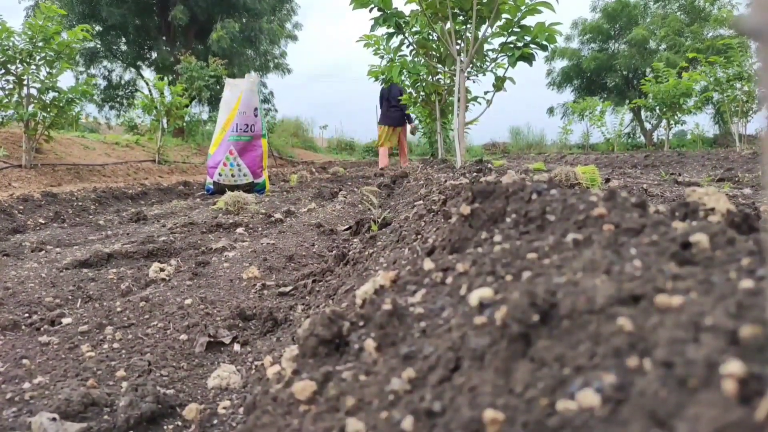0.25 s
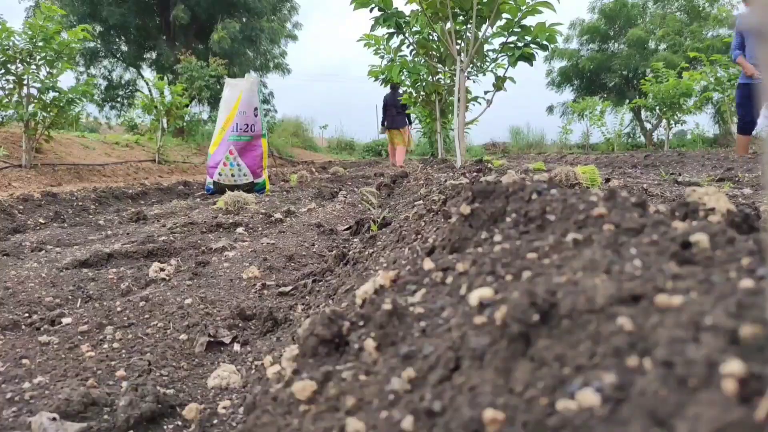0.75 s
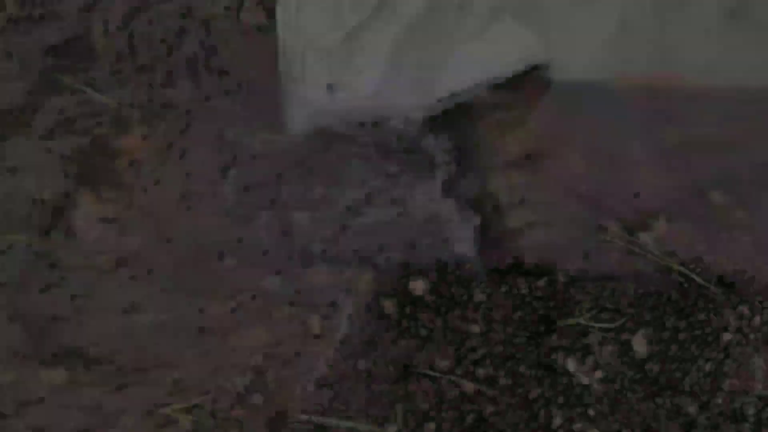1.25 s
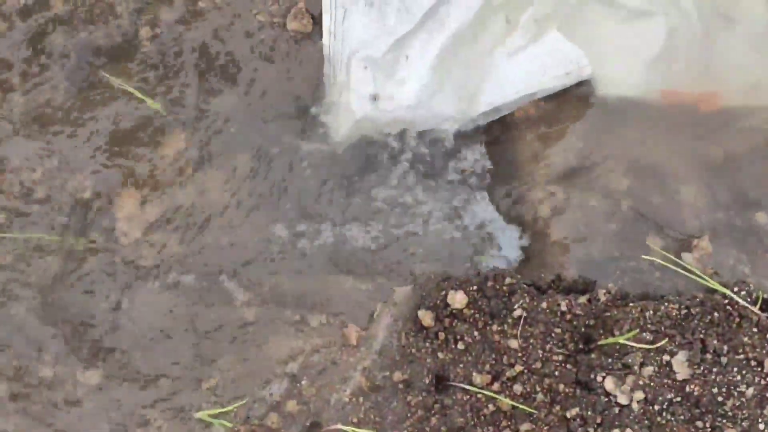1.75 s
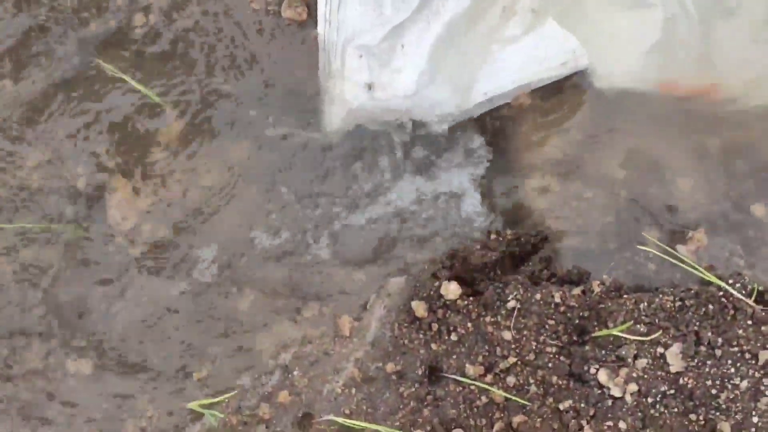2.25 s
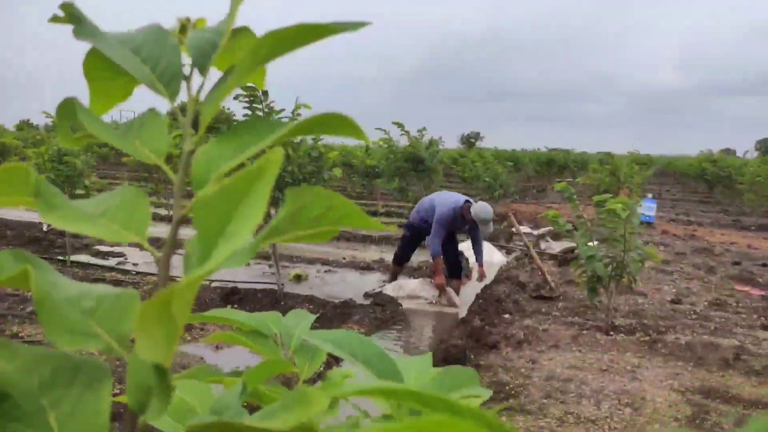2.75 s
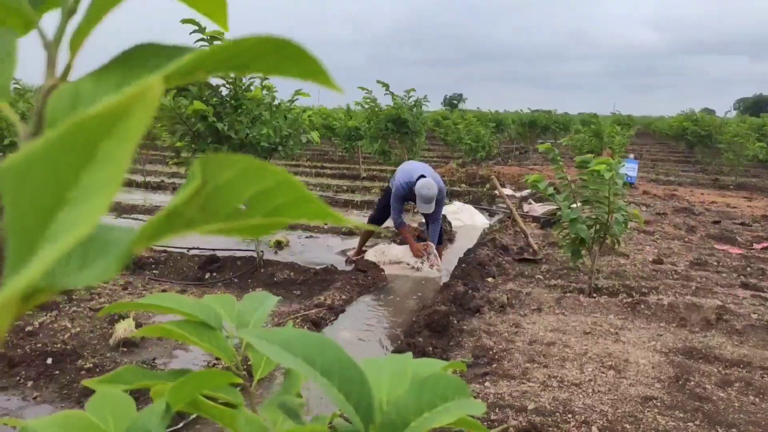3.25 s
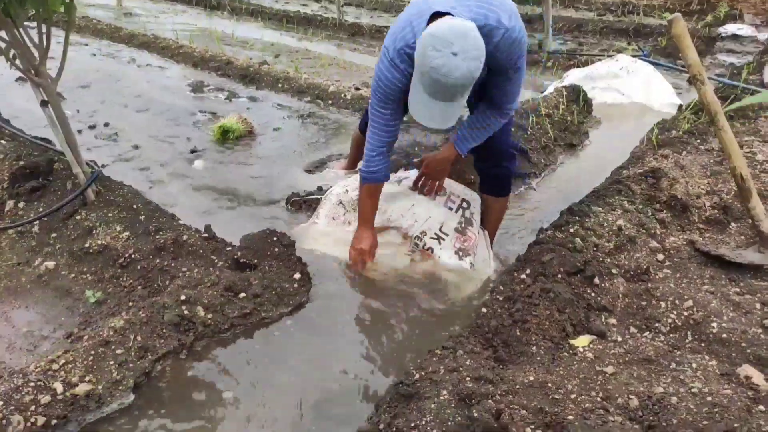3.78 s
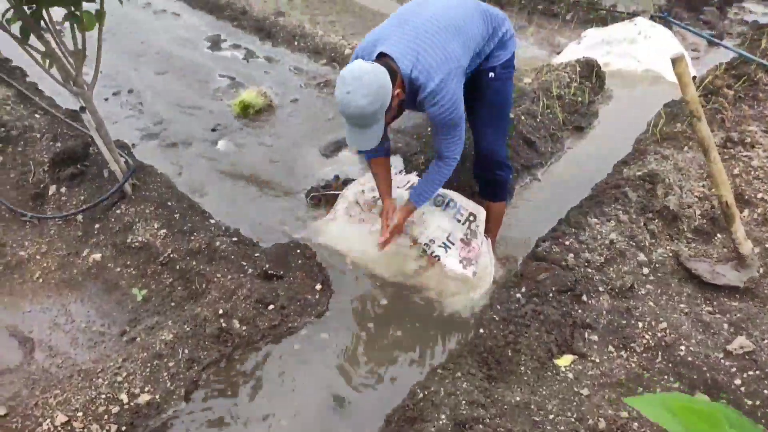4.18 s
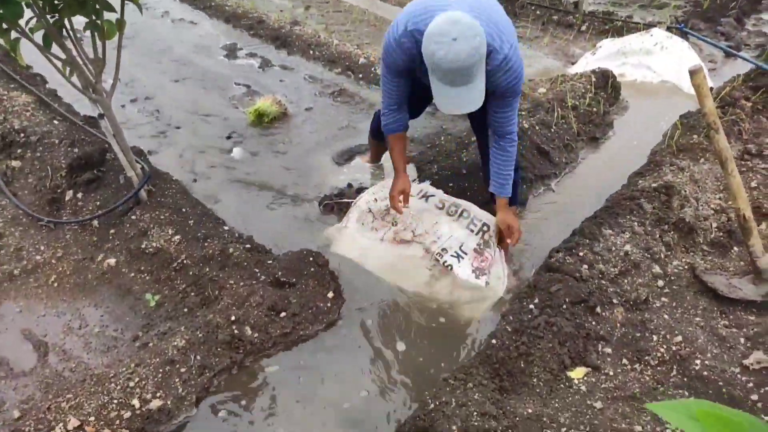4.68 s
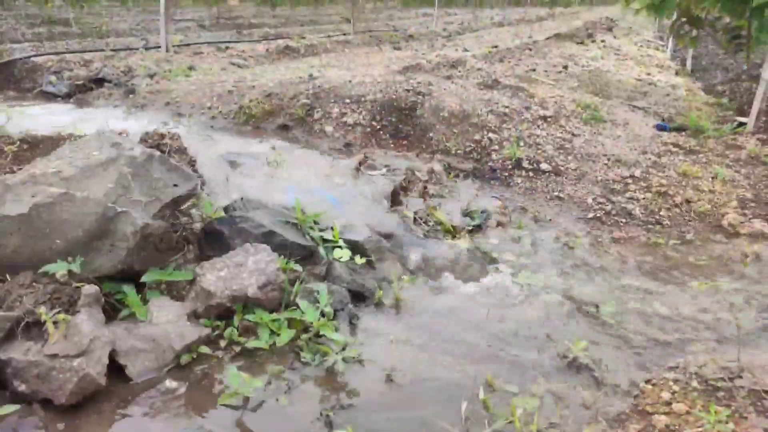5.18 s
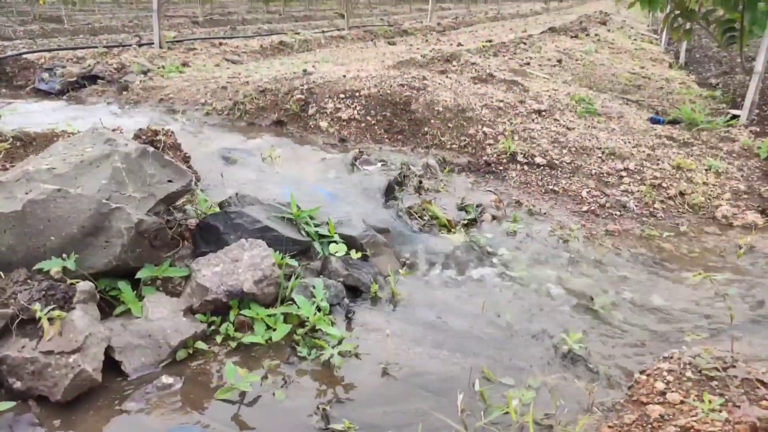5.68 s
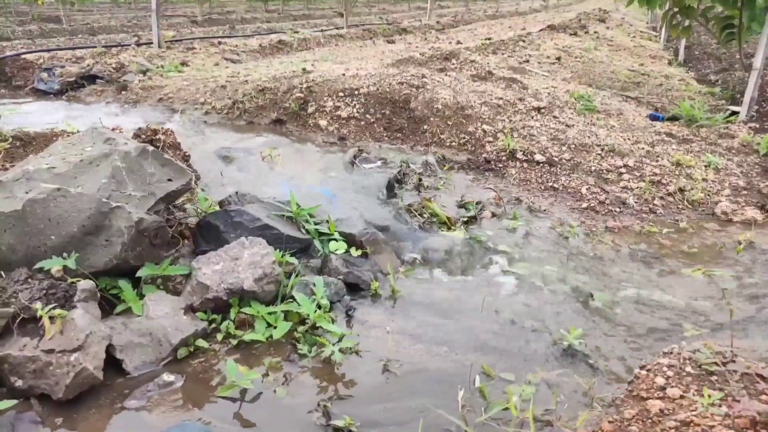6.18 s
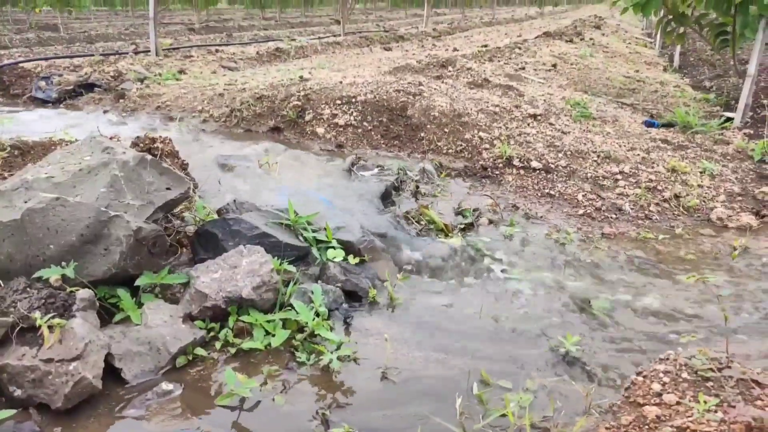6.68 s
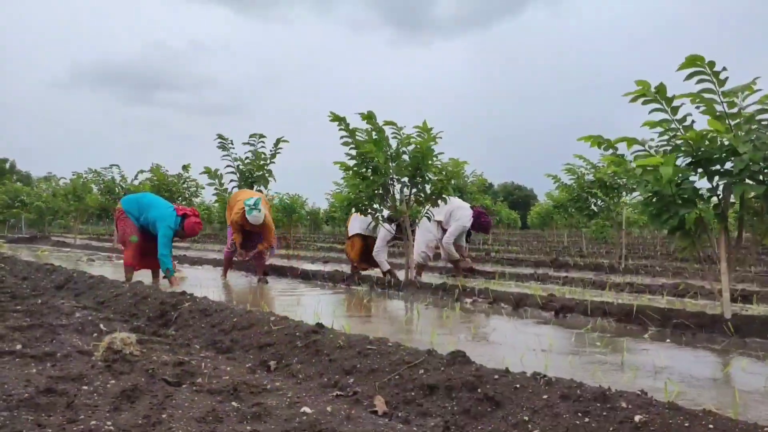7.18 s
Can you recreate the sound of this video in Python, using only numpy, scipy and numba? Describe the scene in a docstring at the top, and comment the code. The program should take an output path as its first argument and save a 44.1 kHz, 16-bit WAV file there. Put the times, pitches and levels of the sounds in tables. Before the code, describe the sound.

Irrigation water spills past a sack, runs down a furrow and rushes over stones while wind gusts buffet the microphone.

```python
"""An open field: a breeze with gusts buffets two microphone ports throughout, over soft far-off knocks at first.
Then irrigation water is heard from four spots in turn: spilling past a sack, while a bird warbles once, running
down a furrow, splashed as the sack is pressed into the channel, and rushing over stones; wind is left at the end.
The water is a swarm of ringing bubbles and droplets over filtered noise, the wind is noise in drifting bands,
each buffet a push and pull of pressure, the knocks brief swells of noise, and the bird gliding sines."""
import sys
import numpy as np
from scipy import signal
from scipy.fft import rfft, irfft, next_fast_len
from scipy.io import wavfile
from scipy.ndimage import uniform_filter1d
from numba import njit

SR = 44100
rng = np.random.default_rng(int(sys.argv[2]) if len(sys.argv) > 2 else 0)


def dump_mix(stems):
    """Bounce the given channels to the path in sys.argv[1] as a 16-bit WAV at rate SR."""
    frames = np.atleast_2d(stems).T  # one column per channel
    limited = np.clip(frames, -1, 1)  # hard clip at full scale
    pcm = np.round(limited * 32767).astype(np.int16)
    wavfile.write(sys.argv[1], SR, pcm)


N = 327663
TIME = np.arange(N) / SR  # s
FADE_S = 0.03  # each spot of water fades in over this time


def from_db(db):
    """Decibels to gain."""
    return 10 ** (np.asarray(db) / 20)


def rms_one(x):
    """Scale to rms 1."""
    return x / np.sqrt(np.mean(x ** 2) + 1e-20)


def at_hz(points, hz):
    """Read a spectrum in dB on a log-frequency axis."""
    f, value = np.transpose(points)
    return np.interp(np.log(hz + 1e-3), np.log(f), value)


def panned(side_db):
    """Left and right gains of unit mean power, from the left-right difference in dB."""
    gains = from_db(np.array([side_db, -side_db]) / 2)
    return gains / np.sqrt(np.mean(gains ** 2, axis=0))


def coloured(x, gain_at):
    """Filter by a smooth gain over frequency."""
    size = next_fast_len(N + 4096)
    hz = np.arange(size // 2 + 1) * SR / size
    return irfft(rfft(x, size) * gain_at(hz), size)[..., :N]


def drift(rate):
    """Slow random wandering of spread 1: noise through a two-pole low-pass at the given rate in Hz."""
    step = 20  # samples between the computed points
    r = np.exp(-2 * np.pi * rate * step / SR)
    noise = rng.standard_normal(N // step + 2002)
    slow = signal.lfilter([1], [1, -2 * r, r * r], noise)[2000:]  # the start-up is dropped
    return np.interp(np.arange(N) / step, np.arange(len(slow)), rms_one(slow))


def swell(s, db, length, onset_power, drop_power):
    """Power that rises to a peak and falls again; a power of 2 is a plain bell, a higher one is squarer."""
    shape = np.zeros(N)
    near = np.abs(TIME - s) < 4 * length
    t = (TIME[near] - s) / length
    shape[near] = np.exp(-np.abs(t) ** np.where(t < 0, onset_power, drop_power))
    return from_db(db) ** 2 * shape


def still_air(level_db):
    """The steady hush of the field: coloured noise, independent left and right."""
    # Colour of the hush. Each row: frequency in Hz, relative level in dB per Hz
    hush = [(290, 1.5), (500, -6), (649, -13), (729, -6), (1300, -9), (3020, -7.5), (5880, -11.5),
            (7860, -9.5), (8830, -12.5), (15100, -11.5), (16000, -22)]
    noise = rng.standard_normal((2, N))
    return from_db(level_db) * rms_one(coloured(noise, lambda f: from_db(at_hz(hush, f))))


def wind_levels():
    """Wind at the left and right port in dB: gusts ride on the breeze and strike the windward port harder."""
    # Gusts on the ports. Each row: peak time in seconds, peak level in dB before the wind's trim,
    # half-length in seconds, left-right difference in dB
    gusts = [(0.124, -34, .19, 15), (0.792, -38, 0.23, 1), (1.374, -23, 0.039, 0), (1.465, -18.5, 0.077, 8),
             (1.823, -22, 0.039, 11), (2.014, -28.5, 0.03, 12), (2.147, -29.5, 0.12, 0),
             (2.506, -26, 0.056, 11), (2.688, -25, 0.092, 5.5), (2.9, -37.5, 0.14, 8),
             (3.973, -24.5, 0.097, -16), (4.132, -14, 0.061, -7.5), (4.288, -15, 0.052, -7.5),
             (4.52, -26, 0.097, -8.5), (4.758, -19, 0.07, -19), (4.951, -14, 0.049, -19),
             (5.07, -15, 0.063, -13), (6.306, -28.5, 0.044, 5.5), (6.49, -27.5, 0.073, 11),
             (6.939, -29, 0.04, -1), (7.19, -19, 0.062, -9.5), (7.388, -23.5, 0.1, -2)]
    breeze_db, breeze_side_db = -40.5, 1.5  # level before trim, left-right difference
    power = (from_db(breeze_db) * panned(breeze_side_db)[:, None]) ** 2
    for s, db, length, side_db in gusts:
        gust = swell(s, db, length, onset_power=1.85, drop_power=2.6)
        power = power + panned(side_db)[:, None] ** 2 * gust
    return 10 * np.log10(power)


def port_wind(level_db, lumpy_db, lumps_per_s, brighten, trim_db):
    """Turbulence at one port: it comes in lumps, and stronger wind sheds smaller, higher eddies."""
    # Turbulence in a moderate gust. Each row: frequency in Hz, relative level in dB per Hz
    turbulence = [(12, -13), (25, 1.5), (50, -2), (90, -2), (150, -2.5), (250, -10.5), (400, -18),
                  (700, -34.5), (1400, -46), (3000, -53.5)]
    out = np.zeros(N)
    lumps = drift(lumps_per_s)
    edges = 14 * 2 ** (np.arange(13) * 2 / 3)  # Hz, bands two thirds of an octave wide
    centres = np.sqrt(edges[1:] * edges[:-1])
    shares = from_db(at_hz(turbulence, centres)) * np.sqrt(centres)  # a higher band is wider
    shares = shares / np.linalg.norm(shares)
    white = rng.standard_normal((2, N))  # neighbouring bands take different noise
    for k, share in enumerate(shares):
        band_pass = signal.butter(2, edges[k:k + 2], "band", fs=SR, output="sos")
        band = rms_one(signal.sosfilt(band_pass, white[k % 2]))
        small = np.clip(np.log2(centres[k] / 70) / 3, 0, 1)  # 0 for big eddies, 1 for small ones
        swing_db = lumpy_db * (0.44 + small)
        # offsets the mean power that the lumps would add
        steady_db = swing_db ** 2 * np.log(10) / 20
        brighter_db = brighten * small * (level_db + 28.0)
        out += share * band * from_db(swing_db * np.minimum(lumps, 2) - steady_db + brighter_db)
    # the breeze and gusts alone set the slow swell
    slow_rms = np.sqrt(uniform_filter1d(out ** 2, size=4000) + 1e-12)
    return out / slow_rms * from_db(level_db + trim_db)


def buffets(level_db):
    """An eddy crossing a port gives one push and pull of pressure."""
    # Single eddies that thump a port. Each row: time in seconds, peak in dB before level_db,
    # left-right difference in dB, length in seconds
    eddies = [(1.468, -7.5, 17, 0.0057), (1.509, -6.5, 22, 0.0025), (1.647, -12.5, 27, 0.0033),
              (2.481, -8.5, 28, 0.0051), (2.715, -10.5, 17, 0.0024), (3.557, -15, -24, 0.0036),
              (4.036, 2.5, -46, 0.0068), (4.535, -4, -30, 0.0048), (4.689, -12.5, -19, 0.002),
              (4.85, -18, -11, 0.0017), (4.931, -6, -30, 0.0014), (4.95, -4.5, -25, 0.0016),
              (5.163, -11, -16, 0.0016), (4.144, -9, -1, 0.0019), (7.145, -11, -18, 0.0019),
              (7.348, -8, 16, 0.0022)]
    out = np.zeros((2, N))
    for s, db, side_db, length in eddies:
        u = (s - TIME) / length
        push_pull = 2 * u / (1 + (2 * u) ** 2) ** 2 * np.pi
        out += from_db(db + level_db) * panned(side_db)[:, None] * push_pull
    return out


def knocks(width):
    """Soft, dull far-off knocks: brief swells of noise round one pitch."""
    # Each row: time of the peak in seconds, level in dB, pitch in Hz
    far_knocks = [(0.422, -42.5, 527), (0.448, -49, 632), (.5, -51, 493), (0.559, -48, 577),
                  (0.816, -45.5, 337)]
    half_length_s = 0.015
    out = np.zeros((2, N))
    for s, db, hz in far_knocks:
        b, a = signal.butter(2, [hz / (1 + width), hz * (1 + width)], "band", fs=SR)
        body = signal.lfilter(b, a, rng.standard_normal(N))
        out += from_db(db) * rms_one(body) * np.exp(-((TIME - s) / half_length_s) ** 2)
    return out


def bird(level_db, side_db, flutter_db, husky):
    """One quick phrase: each note swells, glides from pitch to pitch and fades; fast waver makes it husky."""
    # Each row: start in seconds, length in seconds, level in dB before level_db and flutter,
    # first and last pitch in Hz before the waver
    notes = [(2.099, 0.048, -34, 3950, 3020), (2.168, 0.02, -25, 2890, 3360),
             (2.177, 0.039, -29, 3600, 3520), (2.208, 0.033, -33, 2890, 2890),
             (2.234, .02, -31.5, 3580, 3020), (2.259, 0.014, -26, 2800, 3930),
             (2.271, 0.0125, -23.5, 3380, 2970), (2.282, 0.0099, -30, 3750, 3600)]
    out = np.zeros(N)
    waver = 1 + husky * drift(510)
    for s, length, db, first_hz, last_hz in notes:
        singing = (TIME > s) & (TIME < s + length)
        u = (TIME[singing] - s) / length
        hz = (first_hz + (last_hz - first_hz) * u) * waver[singing]
        phase = 2 * np.pi * np.cumsum(hz) / SR
        out[singing] += from_db(db) * np.sqrt(np.sin(np.pi * u)) * np.sin(phase)
    return panned(side_db)[:, None] * from_db(level_db + flutter_db * drift(250)) * out


@njit
def ring_bubbles(start, height, hz, cycles, rise, length, sr):
    """Sum of dying sines, each climbing in pitch as its bubble nears the surface."""
    out = np.zeros(length)
    for k in range(len(start)):
        life = cycles[k] / hz[k]  # s to fade to 1/e
        first = max(int(start[k] * sr) + 1, 0)
        last = min(int((start[k] + 5 * life) * sr), length)
        for i in range(first, last):
            t = i / sr - start[k]
            envelope = (1 - np.exp(-2 * hz[k] * t)) * np.exp(-t / life)
            out[i] += height[k] * envelope * np.sin(2 * np.pi * hz[k] * t * (1 + rise * t / life))
    return out


def swarm(span, spectrum, low_hz, high_hz, per_s, spread_db, cycles, rise, splashing, lead, scatter, wash_db):
    """Bubbles of random size and place, born in splashes, over a wash of ones too small to tell apart; rms 1."""
    inside = (TIME >= span[0]) & (TIME <= span[1])
    count = int(per_s * (span[1] - span[0]))
    when, pitch, size, damping, place, side = rng.random((count, 6)).T
    births = np.cumsum(inside * splashing)
    start = np.interp(when * births[-1], births, TIME)
    hz = low_hz * (high_hz / low_hz) ** pitch
    lasting = .5 * 4 ** damping  # some ring half as long, some twice
    # high bubbles die sooner and share a wider band, so the same density needs more height
    size_db = spread_db * np.minimum(-np.log(1 - size), 3.2)
    height = hz / np.sqrt(lasting) * from_db(at_hz(spectrum, hz) + size_db)
    # each place in the stream reaches the two ports with its own delay
    delay = lead + scatter * np.log((place + 1e-6) / (1 - place + 1e-6))
    gains = panned(8 * (side - .5))
    rings = np.array([
        ring_bubbles(start + c * delay, height * gains[c], hz, cycles * lasting, rise, N, SR)
        for c in (0, 1)])
    noise = rng.standard_normal((2, N))
    wash = coloured(noise, lambda f: from_db(at_hz(spectrum, f)) * (f > low_hz) * (f < high_hz))
    gate = uniform_filter1d(inside * 1., size=256)
    wash = from_db(wash_db) * rms_one(wash * np.sqrt(splashing)) * gate
    both = rings / rings[:, inside].std() + wash
    return both / both[:, inside].std()


def plops(span, level_db, rise, count=3):
    """The bubbles and drops that stand out of the swarm at one spot, each followed by its quieter fragments."""
    # Large bubbles and drops. Each row: start in seconds, height in dB before level_db, starting pitch in Hz
    large_bubbles = [(1.271, -26, 1750), (1.376, -16.5, 5740), (1.485, -22, 8000), (1.608, -18, 6200),
                     (1.682, -23, 1450), (1.992, -24.5, 2410), (2.018, -19.5, 780), (2.034, -16.5, 980),
                     (2.056, -23.5, 1420), (2.068, -17, 6730), (2.171, -18, 1800), (2.253, -16.5, 1630),
                     (2.276, -11.5, 6100), (2.293, -14, 6160), (2.325, -21, 1820), (2.531, -20.5, 824),
                     (2.609, -20, 1660), (2.905, -19, 7600), (2.978, -26, 930), (3.113, -25, 630),
                     (3.44, -30, 855), (3.686, -27.5, 4200), (4.089, -17, 7700), (4.104, -20, 5840),
                     (4.138, -20, 6400), (4.151, -21, 5620), (4.199, -16.5, 7430), (4.422, -19.5, 2770),
                     (4.003, -26, 1900), (4.319, -24.5, 2380), (4.583, -28, 6360), (4.745, -29, 7850),
                     (4.892, -30, 5700), (4.943, -27, 4660), (5.114, -20.5, 1270), (5.137, -23, 3400),
                     (5.208, -19.5, 3080), (5.27, -18, 1940), (5.507, -21.5, 1167), (5.543, -20.5, 1280),
                     (5.591, -19.5, 820), (5.787, -18.5, 5130), (5.868, -20.5, 1140), (5.952, -16, 4020),
                     (5.976, -16.5, 5000), (5.985, -16, 6460), (6.264, -17, 7840), (6.274, -22, 1400),
                     (6.394, -20, 2700), (6.434, -8, 5500), (6.543, -13, 2620), (6.685, -16, 6080),
                     (6.765, -20.5, 4140), (6.818, -19.5, 1600), (6.949, -32.5, 5100)]
    # fragments: mean delay, loss, and largest shift of pitch either way
    fragment_s, fragment_loss_db, fragment_octaves = .008, 14.5, 0.28
    rings = []
    for s, db, hz in large_bubbles:
        if span[0] < s < span[1] + FADE_S:
            rings.append((s, db, hz))
            for late, off in rng.uniform([0, -1], [2, 1], (count, 2)):
                fragment_hz = hz * 2 ** (fragment_octaves * off)
                rings.append((s + fragment_s * late, db - fragment_loss_db, fragment_hz))
    s, db, hz = np.transpose(rings).copy()
    # 2 cycles to 1/e at 1 kHz; smaller, higher bubbles ring for more cycles
    cycles = 2 * (hz / 1000) ** 0.51
    return ring_bubbles(s, from_db(db + level_db), hz, cycles, rise, N, SR)


def flow(span, gurgle_db, spray_db):
    """Strength of gurgle and spray at one spot: a steady flow plus the sloshes above it."""
    # Each row: peak time in seconds, gurgle peak in dB, spray peak in dB, half-length in seconds
    sloshes = [(1.697, -40, -42, 0.027), (2.04, -38, -61, 0.011), (2.584, -38, -37, 0.065),
               (2.36, -46, -41.5, 0.051), (2.85, -38, -46, 0.016), (3.83, -50, -56, 0.13),
               (4.017, -43, -45, 0.029), (4.14, -46, -42, 0.043), (4.232, -40, -38.5, 0.079),
               (4.407, -45.5, -40.5, 0.075), (4.52, -43, -47.5, 0.02), (4.717, -53, -51, 0.028),
               (5.292, -37.5, -39, 0.019), (5.973, -40, -39, 0.016), (6.268, -44, -33, 0.018)]
    power = from_db([[gurgle_db], [spray_db]]) ** 2
    for s, gurgle_peak, spray_peak, length in sloshes:
        if span[0] < s < span[1]:
            peaks_db = [[gurgle_peak], [spray_peak]]
            power = power + swell(s, peaks_db, length, onset_power=1.4, drop_power=2.9)
    return np.clip((TIME - span[0]) / FADE_S, 0, 1) * np.sqrt(power)


def stream(span, spectrum, sides, bubbles_per_s, drops_per_s, gurgle_db, spray_db, lead, slap_db, fizz_db):
    """Each slap of water traps air that gurgles below 3 kHz and throws droplets that crackle above."""
    gurgle_gain, spray_gain = flow(span, gurgle_db, spray_db)
    slaps = np.minimum(drift(90), 2)
    trapping = from_db(slap_db * slaps)
    bursting = from_db(.4 * slap_db * slaps + 3 * drift(25))
    gurgle = swarm(span, spectrum, 439, 2987, bubbles_per_s, spread_db=3.5, cycles=2.33, rise=0.039,
                   splashing=trapping, lead=lead, scatter=4e-5, wash_db=-3.5)
    spray = swarm(span, spectrum, 2862, 16100, drops_per_s, spread_db=5.5, cycles=4.8, rise=0.019,
                  splashing=bursting, lead=lead, scatter=8e-5, wash_db=fizz_db)
    water = gurgle_gain * gurgle + spray_gain * spray + plops(span, level_db=1.5, rise=0.016)
    # the two ports hear the treble differently
    return coloured(water, lambda f: panned(at_hz(sides, f)))


def spill():
    """Water spilling past a sack: gurgle and spray nearly level."""
    # Colour of the water. Each row: frequency in Hz, relative level in dB per Hz
    colour = [(310, -16), (520, -1), (693, -4.5), (1060, -2.5), (1810, -6), (2030, -11), (2480, -9.5),
              (3930, -18), (4400, -12), (6870, -8), (8270, -17.5), (8890, -19), (15100, -24), (16000, -28)]
    # Tilt between the ports. Each row: frequency in Hz, left-right difference in dB
    tilt = [(800, 1), (1800, 2.5), (3300, -2), (5700, -13.5), (8400, 0), (13000, -2)]
    return stream((1.265, 2.79), colour, tilt, bubbles_per_s=450, drops_per_s=2000, gurgle_db=-42.0,
                  spray_db=-41.0, lead=5e-5, slap_db=4.5, fizz_db=-4.0)


def furrow():
    """Water running down a furrow: fewer bubbles and many fine, softer drops."""
    # Colour of the water. Each row: frequency in Hz, relative level in dB per Hz
    colour = [(240, -45), (400, -6), (666, 3.5), (979, -2), (1180, -4.5), (1650, -0.5), (3810, -13.5),
              (4950, -9.5), (6150, -17.5), (7870, -13), (8900, -19), (15000, -19), (16000, -26)]
    # Tilt between the ports. Each row: frequency in Hz, left-right difference in dB
    tilt = [(800, 1.5), (1800, 5), (3300, -2), (5700, -9), (8400, 7), (13000, -3.5)]
    return stream((2.77, 3.735), colour, tilt, bubbles_per_s=280, drops_per_s=5000, gurgle_db=-43.5,
                  spray_db=-46.0, lead=0.00031, slap_db=3.5, fizz_db=-1.0)


def pressed_sack():
    """Splashes as the sack is pressed into the channel: a faint flow under strong sloshes."""
    # Colour of the water. Each row: frequency in Hz, relative level in dB per Hz
    colour = [(410, -35), (700, -8.5), (1210, -4), (1750, -3), (2400, -2.5), (2840, -7), (3690, -6),
              (6320, -2.5), (7990, -2.5), (11700, -16), (14600, -11), (16000, -25)]
    # Tilt between the ports. Each row: frequency in Hz, left-right difference in dB
    tilt = [(800, 12), (1800, 6), (3300, 8), (5700, -19), (8400, 11.5), (13000, -3)]
    return stream((3.745, 4.96), colour, tilt, bubbles_per_s=800, drops_per_s=1100, gurgle_db=-60,
                  spray_db=-57, lead=8e-5, slap_db=5, fizz_db=-3.0)


def stones():
    """Water rushing over stones: the strongest steady flow, dense in bubbles and drops."""
    # Colour of the water. Each row: frequency in Hz, relative level in dB per Hz
    colour = [(210, -36), (350, -6), (424, -9.5), (817, -3), (1140, -1.5), (2070, -7.5), (2710, -9.5),
              (3340, -6), (5660, -5.5), (7430, -9.5), (8040, -10), (10700, -15), (15000, -15), (16000, -29)]
    # Tilt between the ports. Each row: frequency in Hz, left-right difference in dB
    tilt = [(800, -1), (1800, 1.5), (3300, 0), (5500, -16), (8400, 2), (13000, -5)]
    return stream((4.928, 6.922), colour, tilt, bubbles_per_s=800, drops_per_s=3000, gurgle_db=-37.0,
                  spray_db=-37.0, lead=-0.000039, slap_db=4, fizz_db=-3.5)


def scene():
    """Water, wind, knocks and bird over the hush of the field."""
    air = still_air(level_db=-54)
    wind = np.array([
        port_wind(db, lumpy_db=5.5, lumps_per_s=60, brighten=0.16, trim_db=0.5)
        for db in wind_levels()])
    thumps = buffets(level_db=-4.0)
    far_off = knocks(width=0.17)
    warble = bird(level_db=-3.5, side_db=-14, flutter_db=2.5, husky=0.038)
    water = spill() + furrow() + pressed_sack() + stones()
    return air + wind + thumps + far_off + warble + water


def record(dry):
    """The deepest rumble is lost, peaks overload, the top is cut."""
    rumble_cut = signal.butter(1, 12, "high", fs=SR, output="sos")
    overloaded = np.clip(signal.sosfilt(rumble_cut, dry), -1, 1)
    top_cut = signal.ellip(10, .1, 80, 16200, fs=SR, output="sos")  # steep, at 16.2 kHz
    return signal.sosfilt(top_cut, overloaded)


dry = scene()
out = record(dry)
dump_mix(out)
```